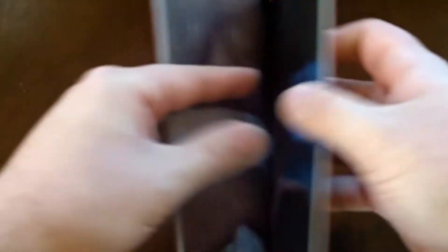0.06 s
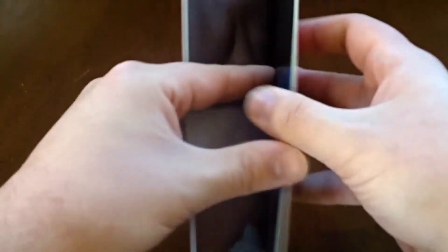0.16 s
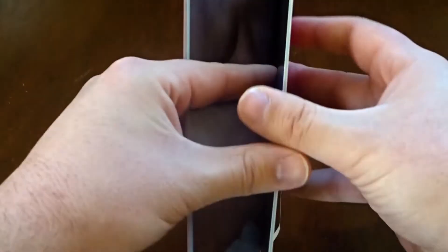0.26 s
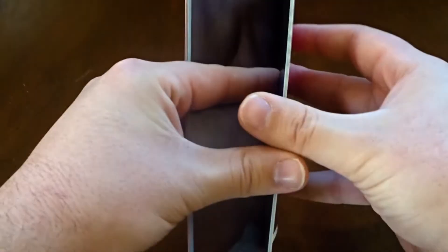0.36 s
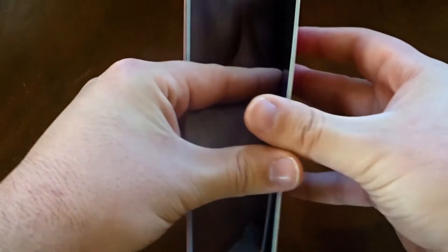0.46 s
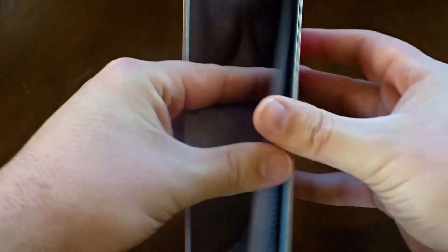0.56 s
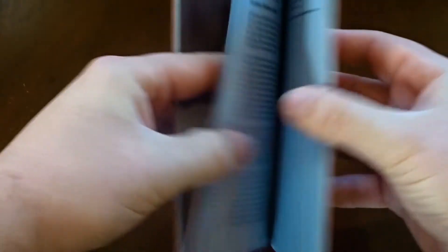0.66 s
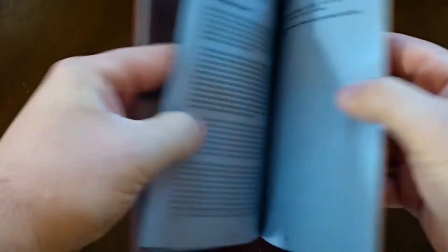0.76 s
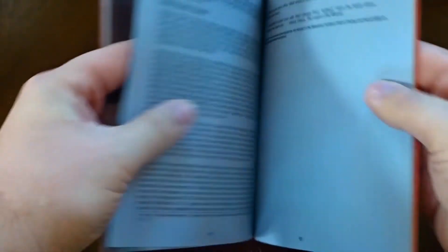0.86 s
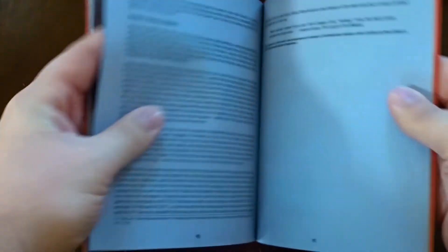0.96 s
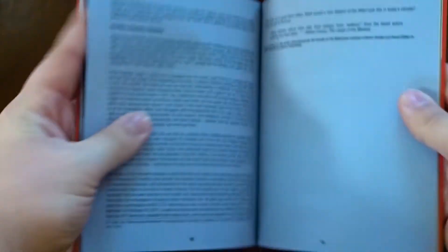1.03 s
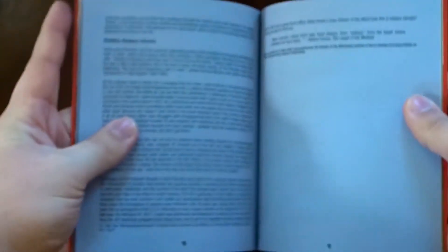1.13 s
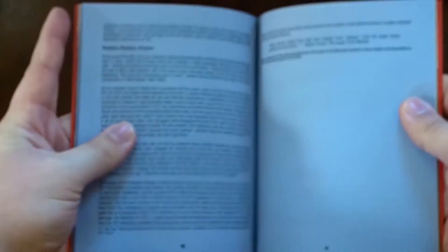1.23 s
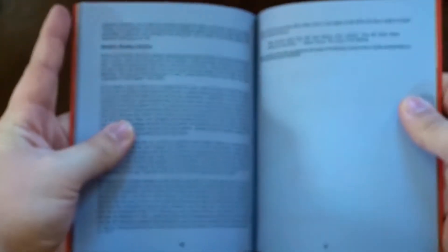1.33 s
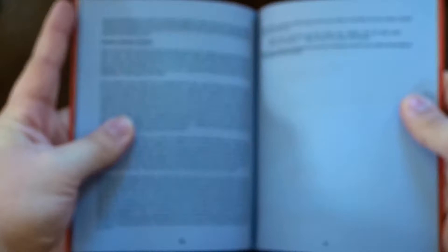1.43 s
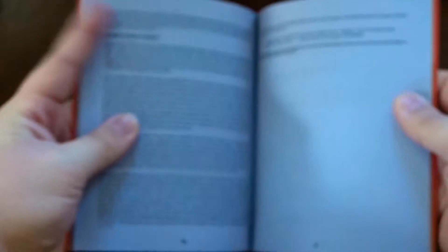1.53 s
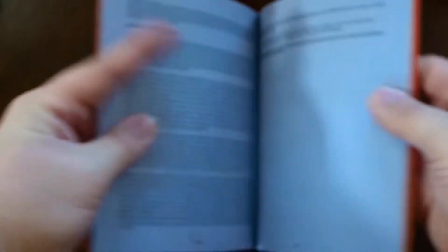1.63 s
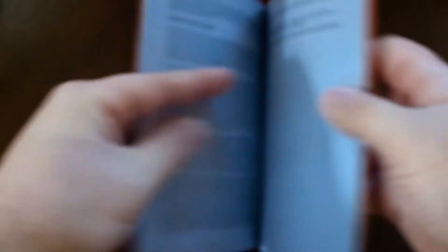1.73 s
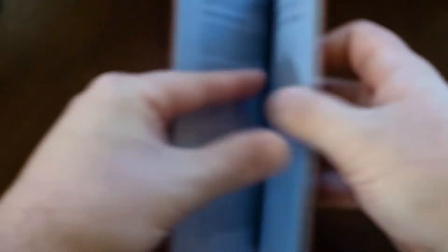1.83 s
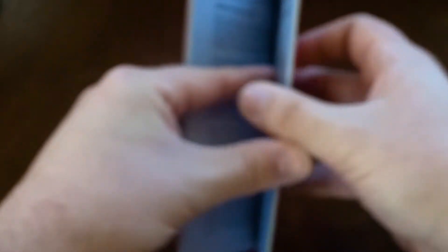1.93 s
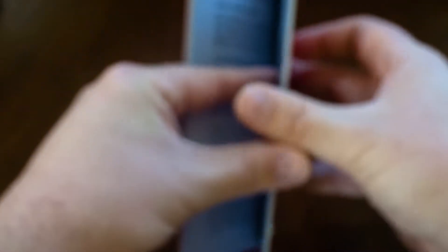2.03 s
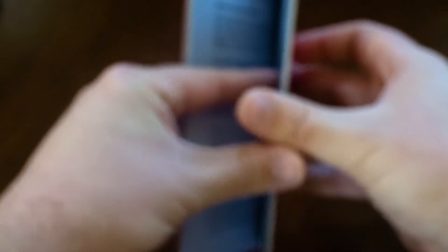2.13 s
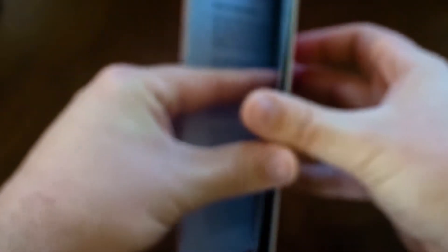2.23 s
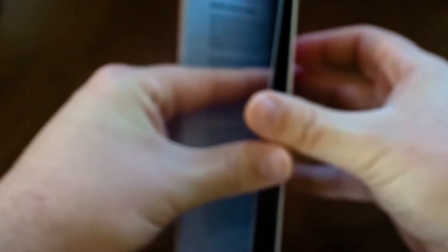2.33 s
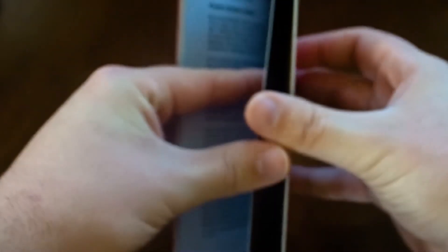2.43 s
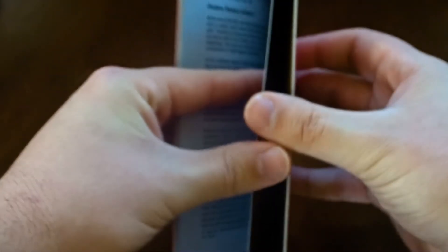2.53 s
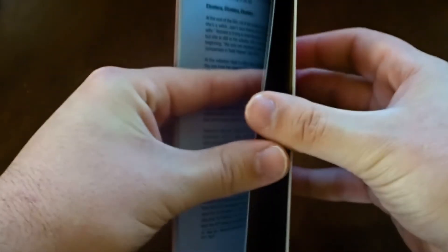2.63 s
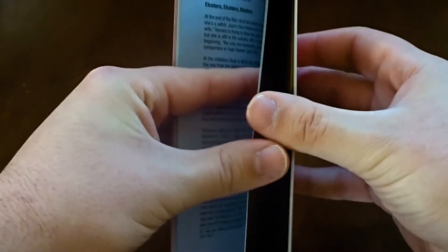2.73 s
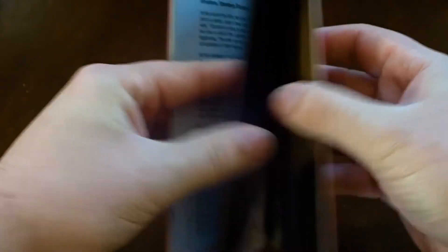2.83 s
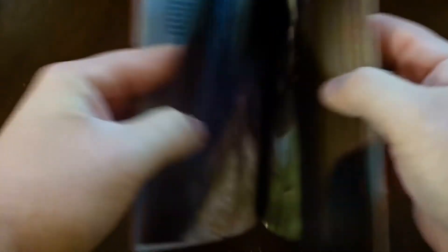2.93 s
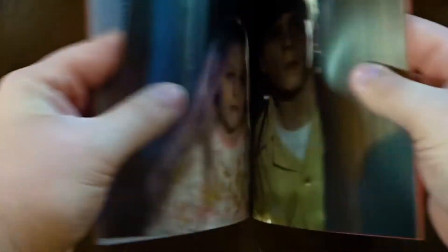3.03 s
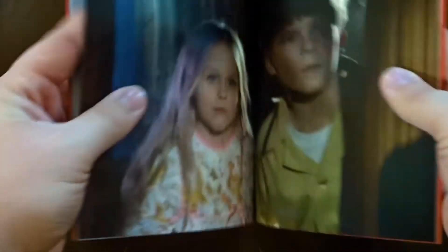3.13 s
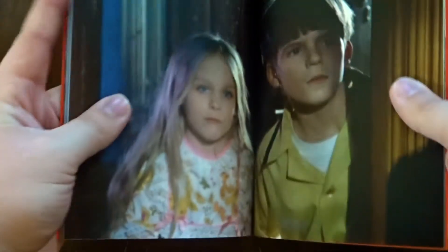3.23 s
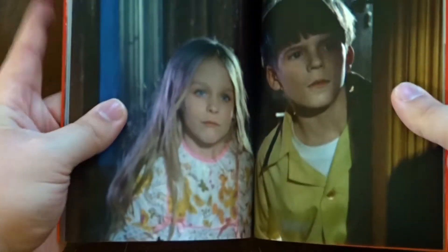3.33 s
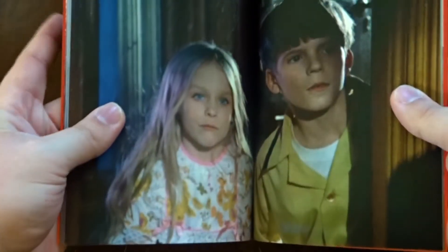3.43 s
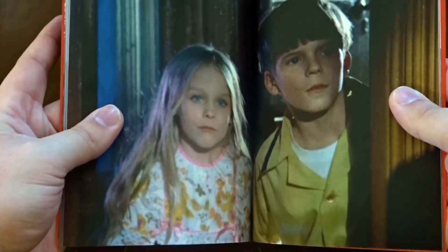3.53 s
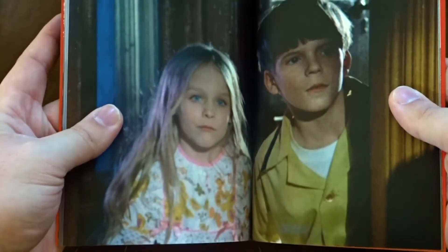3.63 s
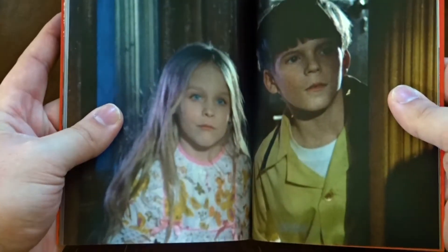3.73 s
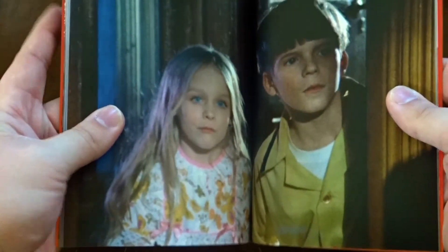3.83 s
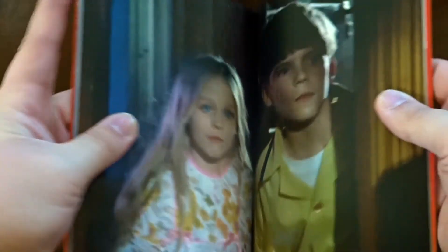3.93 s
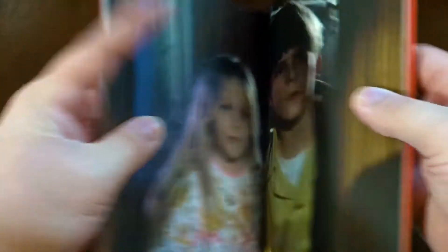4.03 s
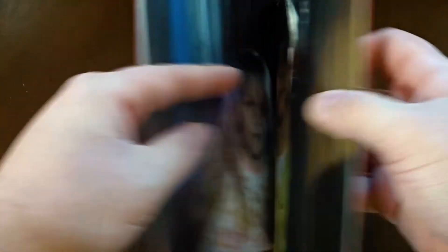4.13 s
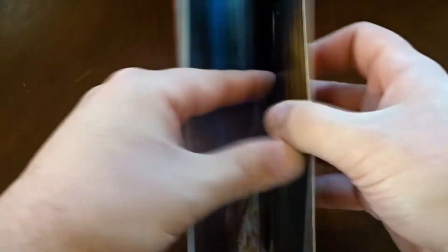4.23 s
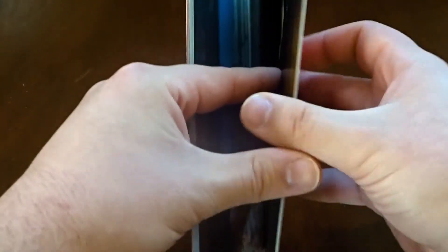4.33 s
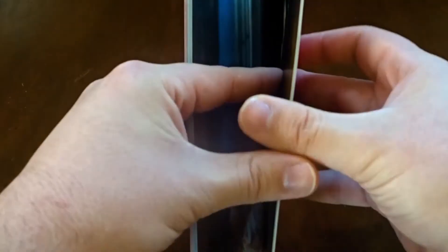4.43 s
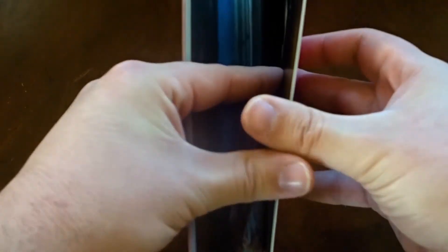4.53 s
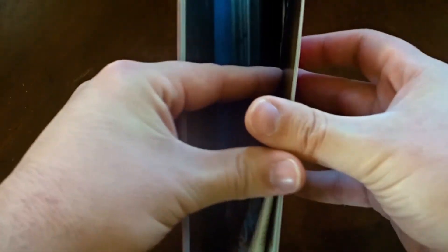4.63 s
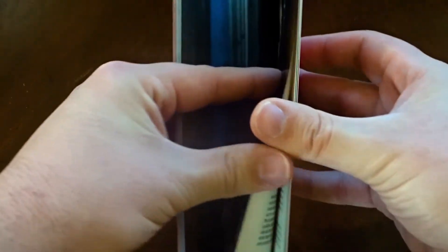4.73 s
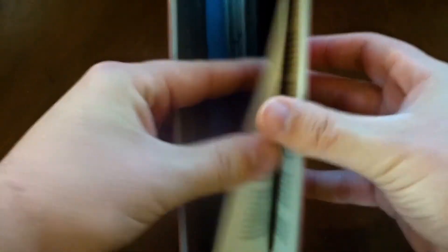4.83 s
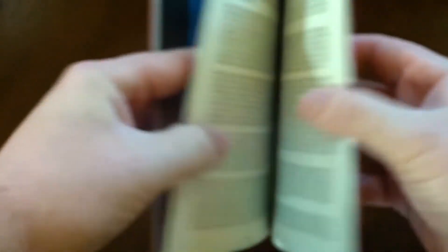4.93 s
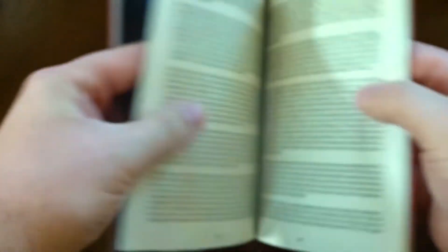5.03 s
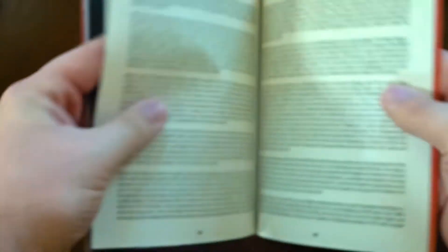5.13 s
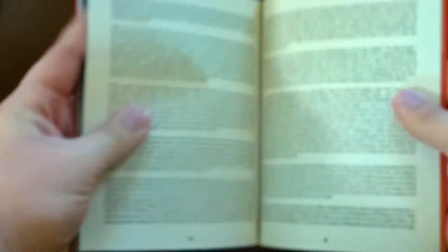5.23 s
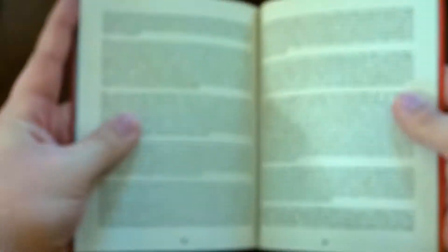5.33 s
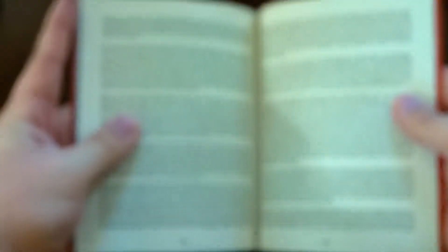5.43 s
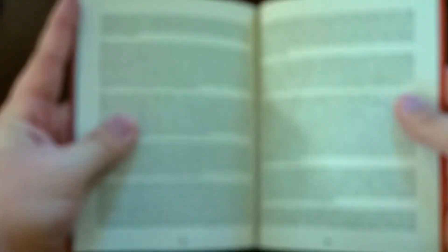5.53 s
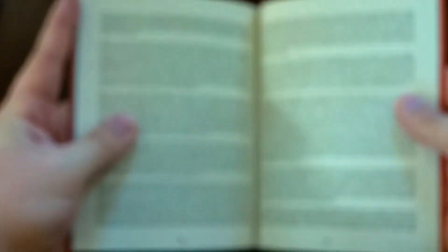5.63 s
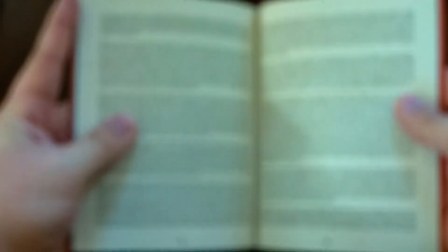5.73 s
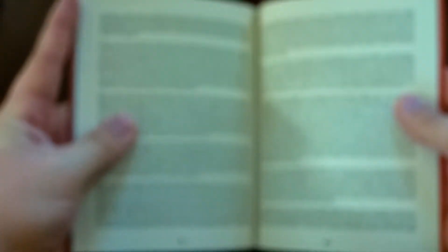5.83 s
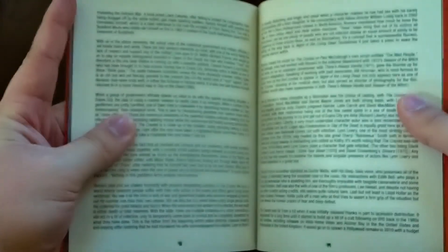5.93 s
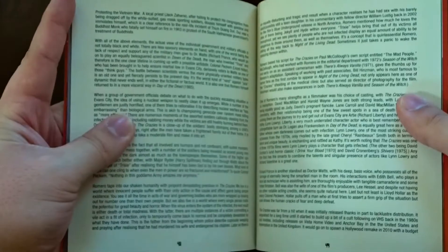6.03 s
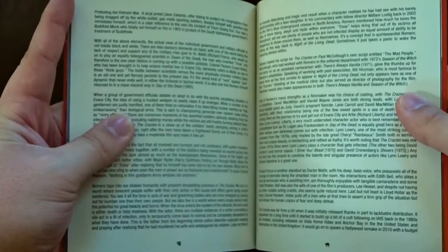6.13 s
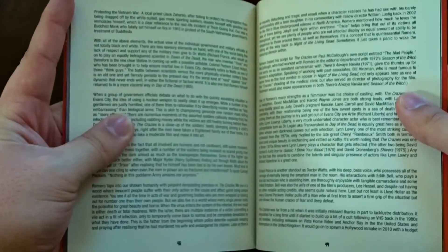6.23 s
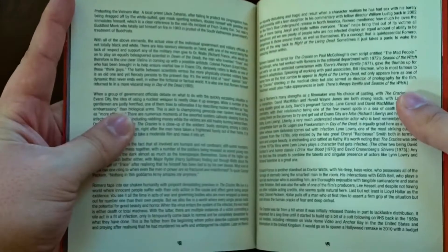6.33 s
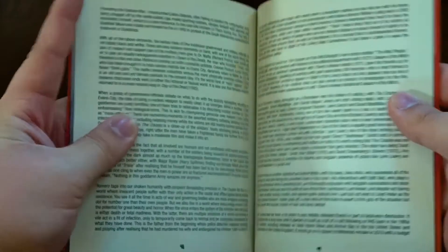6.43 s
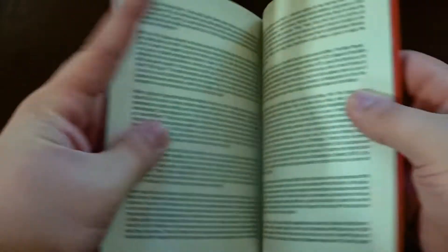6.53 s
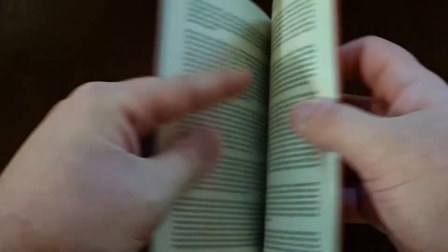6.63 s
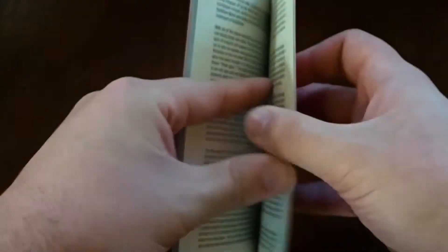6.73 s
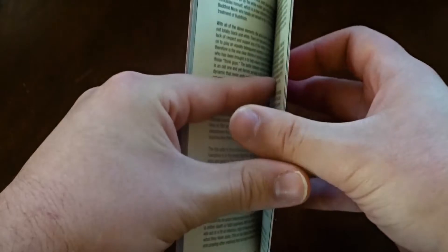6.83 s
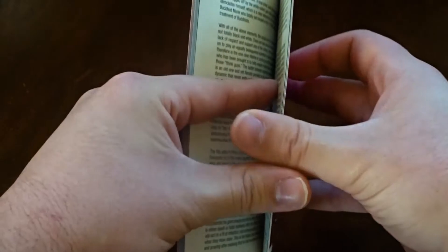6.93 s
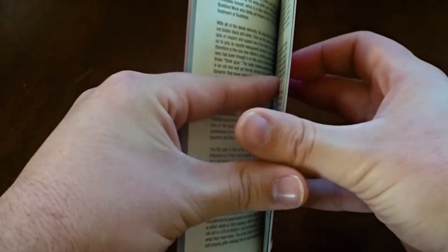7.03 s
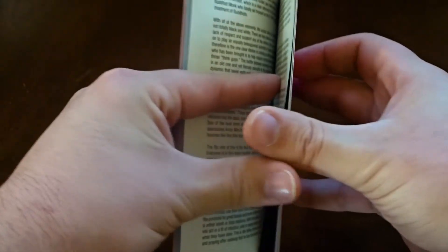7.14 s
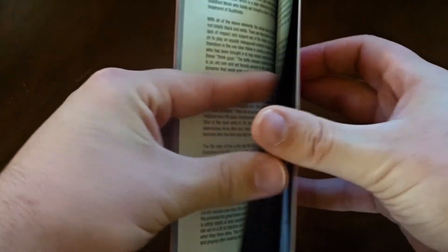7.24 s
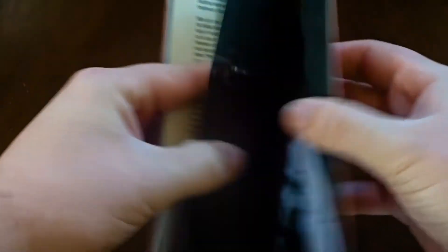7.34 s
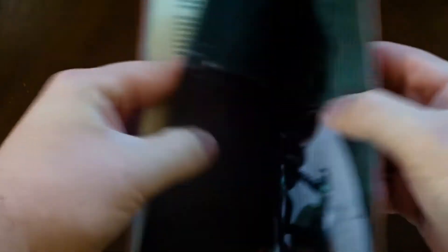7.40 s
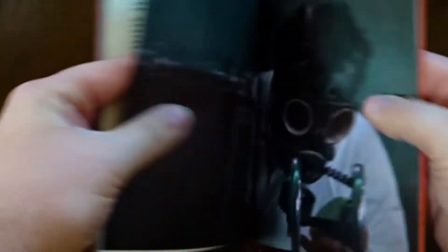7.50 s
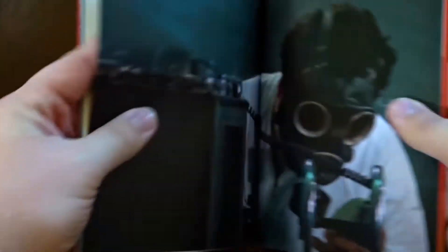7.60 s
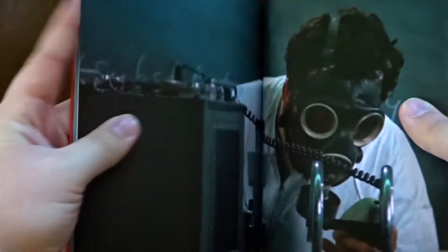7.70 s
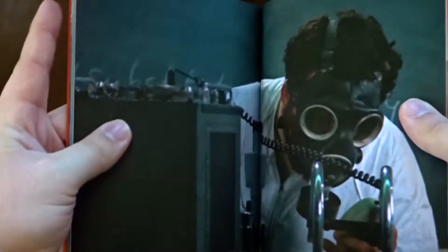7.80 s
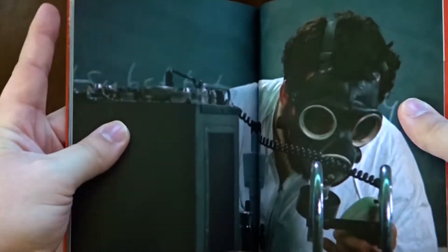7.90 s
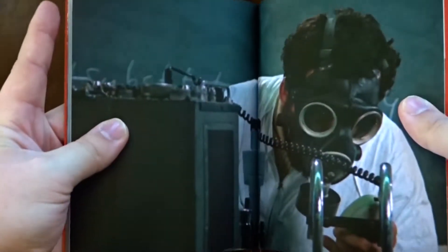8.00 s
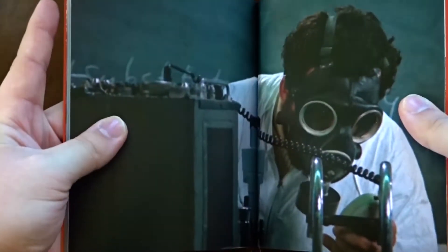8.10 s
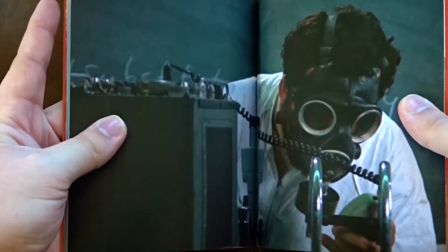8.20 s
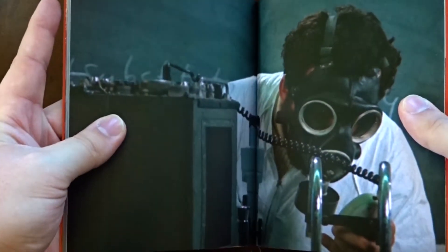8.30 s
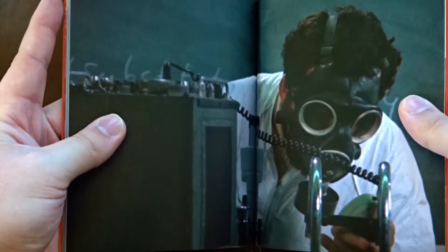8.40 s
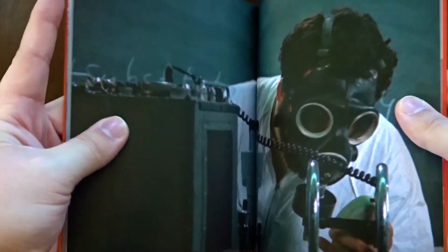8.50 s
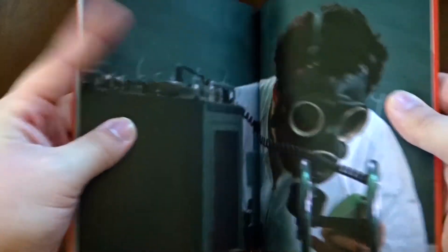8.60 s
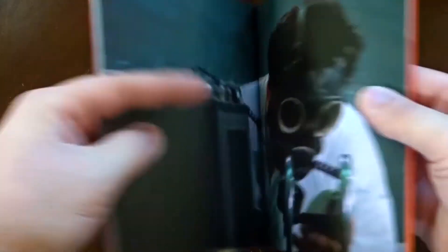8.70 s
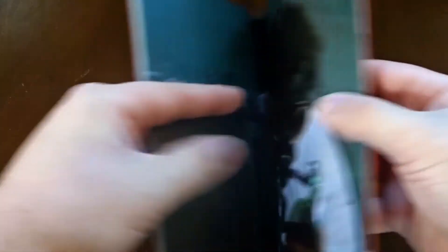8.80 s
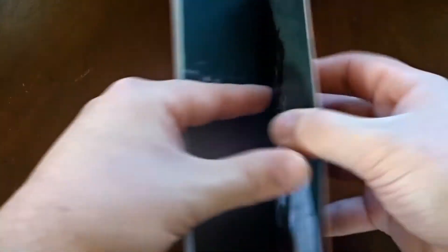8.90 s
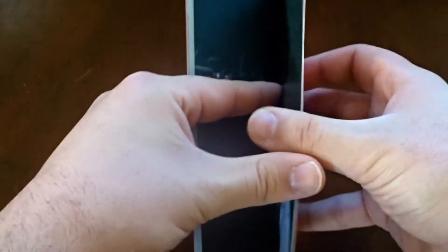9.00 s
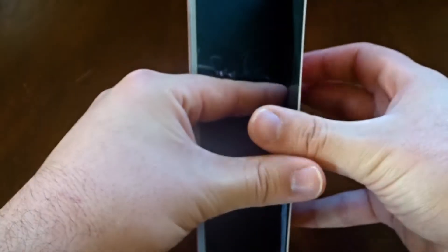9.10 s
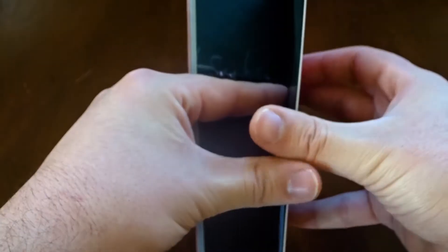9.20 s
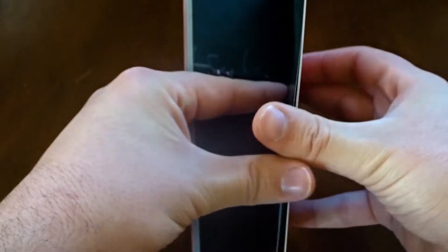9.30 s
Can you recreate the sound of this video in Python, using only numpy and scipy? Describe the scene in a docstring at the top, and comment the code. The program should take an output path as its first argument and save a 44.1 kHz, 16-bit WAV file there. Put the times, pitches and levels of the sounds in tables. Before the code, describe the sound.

Hands open and close a glossy paper booklet again and again, close to the microphone. Each turn brings a few small snaps of page edges, a soft rustle and the bright hiss of thumbs sliding over the paper, sometimes ending in a gentle pat. Short pauses separate the turns, and the crispest come in the middle and later on. A faint low machine hum and thin whir continue behind in the quiet room.

```python
"""A soft rustle and small snaps of paper come first: hands open, smooth and close a glossy booklet.
Thumbs stick and slip on the pages, so the sheets rustle and the skin hisses. Page edges snap free,
the air between pages rings as they open or shut, and pages and fingers land softly on the cover.
Behind this, in a quiet room, a slow machine hums with its turning shaft and whirs in its housing."""
import sys
import numpy as np
from scipy import signal
from scipy.io import wavfile
from scipy.ndimage import uniform_filter1d

SR = 44100
rng = np.random.default_rng(int(sys.argv[2]) if len(sys.argv) > 2 else 0)


def to_wav(s):
    """Save 16-bit WAV."""
    ch = np.atleast_2d(s).T  # columns
    pcm = np.round(np.clip(ch, -1, 1) * 32767)  # PCM
    wavfile.write(sys.argv[1], SR, pcm.astype(np.int16))


N = 412776

# Thumbs smoothing the pages, one list of points per stroke: t/s, rustle level/dB, slide level/dB
STROKES = [
    [(0.0, -58, -60), (0.022, -48.5, -57), (0.046, -53.5, -71), (0.072, -59.5, -60.5), (0.232, -63, -55),
     (0.27, -72, -64)],
    [(0.775, -53, -62), (0.795, -46.5, -45.5), (0.88, -54, -44), (0.9, -49, -53), (0.928, -48, -48),
     (0.95, -44, -37), (1.059, -51.5, -38.5), (1.12, -49.5, -37.5), (1.155, -56, -51)],
    [(1.57, -69, -67), (1.648, -58, -53), (1.685, -57, -55), (1.7, -64, -64), (1.752, -54, -62),
     (1.825, -55, -62), (1.835, -64, -72)],
    [(2.918, -58.5, -59), (3.055, -53, -43), (3.085, -49.5, -49.5), (3.19, -53, -46), (3.262, -44, -43.5),
     (3.29, -59, -54), (3.302, -54, -45.5), (3.325, -65, -60)],
    [(3.908, -66.5, -63), (4.088, -56.5, -59.5), (4.136, -55, -63), (4.144, -48.5, -62),
     (4.206, -53, -55.5), (4.245, -60, -72)],
    [(4.98, -48.5, -59), (5.056, -49, -45.5), (5.104, -49, -48.5), (5.232, -43.5, -40),
     (5.298, -51.5, -42.5), (5.32, -44.5, -39.5), (5.385, -57.5, -48)],
    [(6.5, -62.5, -60), (6.635, -55.5, -59), (6.651, -43.5, -50), (6.681, -47, -61), (6.753, -61.5, -59.5),
     (6.86, -61, -60)],
    [(7.437, -51, -59), (7.485, -50, -42.5), (7.541, -51, -49), (7.623, -46, -41), (7.683, -49.5, -44),
     (7.72, -46.5, -42.5), (7.763, -40, -36.5), (7.785, -57, -54)],
    [(8.63, -57, -54), (8.795, -56, -55), (8.833, -51.5, -53.5), (8.875, -54, -61), (8.959, -60, -61)],
]
# Quick brushes of a finger: loudest t/s, length/s, rustle level/dB, slide level/dB
BRUSHES = [(0.541, 0.039, -49, -47), (0.621, 0.042, -45.5, -48.5), (0.705, 0.078, -54, -49),
           (.733, 0.11, -45, -45), (1.543, 0.027, -54, -42), (2.288, 0.067, -57, -57),
           (2.812, 0.087, -56, -72), (4.294, 0.15, -55, -57), (4.395, 0.13, -58, -55),
           (4.752, 0.092, -39, -42), (4.763, 0.03, -44, -33), (4.935, 0.074, -37, -50),
           (7.18, 0.048, -57, -48), (7.348, 0.026, -48, -66), (7.368, 0.039, -34, -44),
           (8.487, 0.054, -57, -53), (9.13, 0.06, -58, -51), (9.235, 0.092, -56.5, -65)]
def hand_pressure(rise_s=0.02, fade_s=0.031, brush_rise_share=0.37, brush_ends_db=-16.5):
    """How strong rustle and slide are over time: resting fingers, strokes and brushes add up."""
    t = np.arange(0, N / SR, .001)
    power = gain_of([-68.5, -69.5])[:, None] ** 2 * np.ones(len(t))  # resting fingers: rustle, slide
    for stroke in STROKES:
        s, *levels_db = np.transpose(stroke)
        touch = np.interp(t, [s[0] - rise_s, s[0], s[-1], s[-1] + fade_s], [0, 1, 1, 0])
        power += (touch * gain_of([np.interp(t, s, db) for db in levels_db])) ** 2
    for s, length, *levels_db in BRUSHES:
        from_peak = np.maximum((s - t) / brush_rise_share, (t - s) / (1 - brush_rise_share)) / length
        power += (gain_of(levels_db)[:, None] * gain_of(brush_ends_db * from_peak ** 0.65)) ** 2
    return [follow(np.c_[t, gain]) for gain in np.sqrt(power)]


# The tone of the thin sheets and of the duller cover: f/Hz, relative level/dB
PAPER_TONE = [(900, -56), (1500, -4.5), (2200, 1), (4500, -1), (6000, -7), (8000, -16), (16000, -32)]
COVER_TONE = [(150, -2), (400, -7), (800, -1.5), (1200, -3.5), (2000, -12), (16000, -52)]
def rustle():
    """Tiny slips of the thumb shake the sheets and, more faintly, the cover."""
    clicks = slips(per_s=18000, spread_db=0.35, clump_db=1.4)
    sheets = flicker(coloured(clicks, PAPER_TONE), depth_db=2.0)
    return sheets + gain_of(-13) * evened(coloured(clicks, COVER_TONE))


# The tone of skin rubbing on paper: f/Hz, relative level/dB
SKIN_TONE = [(3000, -20), (6000, -5), (8000, -4), (10500, -5.5), (13500, -3), (16000, -6)]
# The hiss brightens and dulls with thumb speed: t/s, added level/dB of the highest treble
SHEEN = [(.85, 0.5), (1.08, 1), (1.13, -1.5), (2.93, 0.5), (3.06, 5), (3.2, 7), (3.25, -2.5), (4.4, 4.5),
         (4.72, -2), (5.06, 4), (5.13, 1), (5.2, 4), (5.38, -7.5), (7.48, 4.5), (7.55, -2), (7.6, 1),
         (7.67, -1.5)]
def slide():
    """Skin on glossy paper slips in very fine steps, which makes a bright hiss."""
    clicks = slips(per_s=16000, spread_db=0, clump_db=0.4)
    return flicker(coloured(clicks, SKIN_TONE), depth_db=2.3, treble_db=follow(SHEEN))


# Pitches at which the booklet's edge rings: f/Hz, width/Hz, relative level/dB
EDGE_RINGS = [(1904, 600, -3), (2340, 1100, -1.5), (3120, 560, -5), (4000, 1800, -16.5)]
# Page snaps: t/s, edge peak level/dB, ring f/Hz, then tick and knock level/dB relative to the edge
SNAPS = [(0.062, -38, 3830, -17, -7), (0.1038, -38.5, 4700, -19, -5), (0.6, -36, 2040, -11, -2),
         (0.6913, -33.5, 2060, -6, -12), (0.7285, -28.5, 2030, 1, -1), (0.7834, -37, 1910, -13, -25),
         (1.5645, -41, 2000, 0, 0), (1.6453, -36, 5400, -14, -6), (1.747, -40, 2600, -8, -15),
         (2.1173, -42, 3530, -32, -4), (2.2307, -40.5, 1860, -27, -4.5), (2.682, -24.5, 2870, -9, -38),
         (2.6892, -37, 3100, -16, -30), (2.9073, -38.5, 3380, -15, -14), (2.9304, -35, 1910, 3.5, -7),
         (2.973, -34, 1930, -3, -4.5), (2.991, -35, 2200, -10, -5), (3.3031, -32.5, 1800, 5, -34),
         (4.145, -37, 2480, -21, -27), (4.278, -39.5, 1940, 3.5, -7.5), (4.331, -38.5, 3370, -14, -25),
         (4.471, -33.5, 2700, -15, -23), (4.562, -32.5, 2130, -18, -6.5), (4.603, -41.5, 3000, -20, -20),
         (4.652, -27, 2180, -12, -7.5), (4.731, -28, 6850, -8, -25), (4.7372, -31, 3900, -3, -25),
         (4.742, -31, 3700, 1, -21), (4.747, -27, 4600, -8, -20), (4.7515, -30, 4300, -15, -18),
         (4.904, -31, 3220, -25, -19), (4.9184, -27, 2520, -20, -31), (4.9368, -25, 1940, -3, -12),
         (4.9696, -31, 5060, 2, -4), (6.445, -37.5, 1830, 2, 0.5), (6.488, -45.5, 5000, 4, 2),
         (6.5328, -41.5, 1910, 6, 2.5), (7.056, -45, 3500, -20, -25), (7.209, -41, 2990, -22, -27),
         (7.3424, -33, 2620, -12, -8), (7.36, -26.5, 2400, -14, -14), (7.3695, -21.5, 2020, -8, -13),
         (7.4033, -29.5, 4470, 1, 0), (8.5568, -42, 1880, -18, 1), (8.6262, -36, 7300, 5, 0),
         (8.673, -36.5, 2190, -3, -2), (8.954, -41, 3200, -23, -23), (9.001, -42, 4760, -21, -21)]
def page_snaps():
    """Each page snapping free rings the booklet's edge, with a bright tick and a knock in the cover."""
    t = np.arange(2500) / SR
    for s, edge_db, ring_hz, tick_db, knock_db in SNAPS:
        noise = rng.standard_normal(len(t))
        crack = noise * (1 - np.exp(-t / 0.00036)) * np.exp(-t / 0.00084)
        shiver = crack + 0.12 * noise * np.exp(-t / 0.015)  # the freed page trembles on
        edge = sum(gain_of(db) * evened(resonate(shiver, hz, width)) for hz, width, db in EDGE_RINGS)
        edge += 0.94 * evened(coloured(shiver, PAPER_TONE))
        edge += 0.83 * evened(resonate(shiver, ring_hz, width_hz=910))
        tick = coloured(crack + 0.21 * shiver, SKIN_TONE)
        knock = coloured(shiver, COVER_TONE)
        parts = [(edge, 0), (tick, tick_db), (knock, knock_db)]
        yield s, gain_of(edge_db) * sum(gain_of(db) * part / abs(part).max() for part, db in parts)


# Air gaps between pages: t/s, length/s, starting f/Hz, ending f/Hz, level/dB before shaping
GAPS = [(0.775, 0.18, 5100, 5500, -47), (0.776, 0.073, 1640, 2500, -47), (0.923, 0.14, 2020, 2580, -49),
        (1.087, 0.05, 2730, 7500, -40), (2.942, 0.083, 1870, 1940, -48), (2.976, 0.13, 4700, 5200, -51.5),
        (3.203, 0.055, 1940, 3160, -45), (4.759, 0.016, 4570, 4500, -28), (4.762, 0.015, 5470, 6000, -32.5),
        (4.753, 0.028, 3380, 3440, -35), (4.165, 0.072, 3560, 4200, -48), (4.759, 0.021, 2320, 2400, -35),
        (4.91, 0.049, 2220, 2450, -39.5), (5.013, 0.19, 5000, 5800, -49), (5.188, 0.06, 2200, 2950, -50),
        (5.305, .04, 2680, 3000, -43), (7.434, 0.2, 5000, 5300, -48.5), (7.555, 0.059, 1950, 1890, -46.5),
        (7.635, 0.026, 2870, 3120, -43), (7.689, 0.11, 2310, 3550, -40), (7.731, 0.053, 5450, 6050, -41.5)]
def air_gaps():
    """The air between two pages rings with a gliding pitch while the gap opens or shuts."""
    for s, length, from_hz, to_hz, db in GAPS:
        width_hz = 390 + 0.52 * length * from_hz + 0.11 * abs(to_hz - from_hz)
        yield s, gain_of(db) * puff(length, from_hz, to_hz, width_hz, crackle_db=1.5, peak_share=0.36)


# Soft landings: t/s, length/s, level/dB before shaping, f/Hz
LANDINGS = [(0.594, 0.038, -51.5, 684), (0.727, 0.02, -42, 354), (1.081, 0.074, -50, 880),
            (1.552, 0.074, -51.5, 775), (2.923, 0.041, -52, 850), (3.21, 0.098, -49.5, 830),
            (5.292, 0.088, -48, 660), (6.439, 0.036, -53, 584), (7.722, 0.081, -48.5, 1080),
            (7.815, 0.092, -55.5, 890), (8.546, 0.027, -55, 800)]
def landings():
    """Pages and fingers land on the cover with a low, soft pat."""
    for s, length, db, hz in LANDINGS:
        yield s, gain_of(db) * puff(length, hz, hz, width_hz=0.64 * hz, crackle_db=2.5, peak_share=0.12)


# The shaft's notes: vibrations per turn, relative level/dB
SHAFT_NOTES = [(7, -8), (8, -0.5), (9, -6.5)]
# How loud the shaft hums: t/s, level/dB
HUM_LEVEL = [(0, -50.5), (3.2, -49), (3.6, -52.5), (4.2, -51), (5.2, -53.5), (8.5, -51.5), (9.36, -56.5)]
# Other steady tones: f/Hz, level/dB
STEADY_TONES = [(75.2, -69.5), (108.6, -64), (120, -58), (15734, -75)]
def machine_hum(shaft_hz=11.0):
    """The notes of a slow shaft throb together once a turn; a few unrelated tones sound beside them."""
    t = np.arange(N) / SR
    turns = shaft_hz * t + rng.random()
    shaft = sum(gain_of(db) * np.cos(2 * np.pi * per_turn * turns) for per_turn, db in SHAFT_NOTES)
    tones = sum(gain_of(db) * np.sin(2 * np.pi * (hz * t + rng.random())) for hz, db in STEADY_TONES)
    return np.sqrt(2) * (gain_of(follow(HUM_LEVEL)) * shaft + tones)


# The lower and upper ring of the machine's housing: f/Hz, width/Hz, relative level/dB
HOUSING_RINGS = [(1553, 143, 2), (1785, 306, 3.5)]
# How loud the whir is: t/s, level/dB, added level/dB of the upper ring
WHIR_LEVEL = [(0, -60.5, 0), (.35, -66, -5), (.7, -56, 3), (1.15, -64, -5), (1.45, -54, -2),
              (1.95, -60.5, -1), (2.5, -54.5, -5.5), (3.0, -58, -2.5), (4.3, -60.5, 2.5), (5.3, -60, -3),
              (5.75, -53, -3), (6.0, -57.5, -4), (6.7, -59.5, 5), (8.6, -59.5, 0), (9.1, -66, 0),
              (9.36, -56.5, -1)]
def machine_whir(lowest_hz=1445):
    """Fluttering noise rings at two pitches in the housing, which lets little low sound through."""
    noise = 0.99 * rng.standard_normal(N) + rng.standard_normal((2, N))  # shared + each side's own
    noise = signal.sosfilt(signal.butter(8, lowest_hz, "high", fs=SR, output="sos"), noise)
    s, level_db, upper_db = np.transpose(WHIR_LEVEL)
    upper_lean_db = follow(np.c_[s, upper_db]) - np.array([[0], [15]])  # the upper ring leans left
    whir = np.zeros((2, N))
    for (hz, width, db), lean_db in zip(HOUSING_RINGS, [0, upper_lean_db]):
        peak = signal.iirpeak(hz, hz / width, SR)
        ring = evened(signal.lfilter(*peak, signal.lfilter(*peak, noise)))
        whir += gain_of(db + lean_db + 3 * drift(samples=350)) * ring
    return gain_of(follow(np.c_[s, level_db])) * evened(whir)


# How long the echo lasts: f/Hz, time/s to fade by 60 dB
ECHO_FADE = [(300, 1), (2000, 0.52), (6000, 0.082), (15000, 0.018)]
def room_echo(x):
    """Many small reflections, different in each ear; high pitches start weaker and die sooner."""
    bounces = np.zeros((2, SR // 2))
    slots = np.arange(100, SR // 2 - 20, 20)
    arrivals = slots + rng.integers(0, 20, (2, len(slots)))
    np.put_along_axis(bounces, arrivals, rng.choice([-1., 1.], arrivals.shape), 1)
    hz, t, spectra = signal.stft(bounces, SR, nperseg=128)
    fade_db = -60 * t / at_pitch(ECHO_FADE, hz)[:, None] - 0.97 * hz[:, None] / 1000
    tail = signal.istft(spectra * gain_of(fade_db), SR, nperseg=128)[1]
    return signal.oaconvolve(x[None], tail / np.linalg.norm(tail[0]), axes=1)[:, :N]


# The tone of the quiet room: f/Hz, relative level/dB
AIR_TONE = [(15, -8), (55, -1), (140, -4), (228, 0.5), (250, -6.5), (270, -6.5), (400, -9.5), (700, -12),
            (1200, -16.5), (2300, -20.5), (4500, -27), (7000, -30), (16000, -34.5)]
# How alike left and right are: f/Hz, likeness (1 the same, 0 unrelated, -1 opposite)
AIR_LIKENESS = [(45, 1), (90, 0.85), (170, 0.9), (340, 0.2), (520, -0.53), (1250, -0.42), (1550, 0.18),
                (2300, -0.99), (4200, -0.09), (6900, 0.55), (10300, 1), (14000, 1)]
def room_air(level_db=-53):
    """Room air and microphone hiss: steady noise, partly alike in the two ears."""
    hz = np.fft.rfftfreq(2048, 1 / SR)
    a, b, c, d = rng.standard_normal((N // 1024 + 3, len(hz), 4)).T
    left, unrelated = a + 1j * b, c + 1j * d
    likeness = at_pitch(AIR_LIKENESS, hz)[:, None]
    right = likeness * left + np.sqrt(1 - likeness ** 2) * unrelated
    spectra = np.array([left, right]) * gain_of(at_pitch(AIR_TONE, hz))[:, None]
    noise = signal.istft(spectra, window="cosine", nperseg=2048)[1]
    return gain_of(level_db) * evened(noise[:, :N])


def slips(per_s, spread_db, clump_db):
    """Sticking and slipping makes tiny clicks of uneven size that come in clumps."""
    happens = rng.random(N) < per_s / SR
    size_db = spread_db * np.minimum(rng.exponential(1, N), 5)
    clicks = happens * rng.standard_normal(N)
    return evened(clicks * gain_of(size_db + clump_db * drift(samples=130)))


def puff(length_s, from_hz, to_hz, width_hz, crackle_db, peak_share):
    """A crackly puff of ringing noise that swells until peak_share of its length, then fades."""
    count = round(length_s * SR)
    noise, crackle = rng.standard_normal((2, SR // 4))[:, :count]
    noise = noise * gain_of(crackle_db * evened(uniform_filter1d(crackle, size=60)))
    progress = np.linspace(0, 1, count)
    hz = from_hz * (to_hz / from_hz) ** progress ** 1.4  # a glide starts slowly and ends fast
    shape = np.interp(progress, [0, peak_share, .75, 1], [0.47, 0.76, 0.45, 0.07])
    return evened(resonate(noise, hz, width_hz)) * shape


def flicker(x, depth_db, treble_db=0):
    """Turns random patches (about 800 Hz by 30 ms) up or down; treble_db lifts the highest treble."""
    hz, t, spectra = signal.stft(x, SR, nperseg=256)
    patches = rng.standard_normal(spectra.shape[::-1]).T
    patches = evened(uniform_filter1d(uniform_filter1d(patches, size=5, axis=0), size=10, axis=1))
    treble_share = np.interp(hz, [8500, 11900], [0, 1])[:, None]
    lift_db = treble_share * np.interp(t, np.arange(N) / SR, treble_db * np.ones(N))
    return evened(signal.istft(spectra * gain_of(depth_db * patches + lift_db), nperseg=256)[1][:len(x)])


def coloured(x, tone):
    """Filters a sound so that it takes on the tone in a table."""
    log_gain = at_pitch(tone, abs(np.fft.fftfreq(512, 1 / SR))) * np.log(10) / 20
    taps = np.fft.ifft(np.exp(log_gain - 1j * signal.hilbert(log_gain).imag)).real
    return signal.oaconvolve(x, taps / np.linalg.norm(taps))[:len(x)]


def resonate(x, hz, width_hz):
    """Makes a sound ring near hz: shifts that pitch down to zero, smooths twice, and shifts back."""
    turn = np.exp(2j * np.pi * np.cumsum(hz * np.ones(len(x))) / SR)
    decay = np.exp(-np.pi * width_hz / SR)
    return 2 * (turn * signal.lfilter([(1 - decay) ** 2], [1, -2 * decay, decay ** 2], x / turn)).real


def drift(samples):
    """A random wobble, smoothed over this many samples."""
    return evened(uniform_filter1d(uniform_filter1d(rng.standard_normal(N), samples), samples))


def at_pitch(table, hz):
    """Looks up a table by frequency, on a scale of octaves."""
    f, value = np.transpose(table)
    return np.interp(np.log(hz + 1), np.log(f + 1), value)


def follow(table):
    """Joins points in time with straight lines, giving a value for every sample."""
    s, value = np.transpose(table)
    return np.interp(np.arange(N) / SR, s, value)


def gain_of(db):
    """Turns decibels into a number to multiply by."""
    return 10 ** (np.asarray(db) / 20)


def evened(x):
    """Scales a signal to an average strength (rms) of 1."""
    return x / np.sqrt(np.mean(x ** 2) + 1e-20)


def scene():
    """The booklet in front, then its echo, the machine and the room air."""
    short_sounds = [*page_snaps(), *air_gaps(), *landings()]
    rustle_gain, slide_gain = hand_pressure()
    booklet = rustle_gain * rustle() + slide_gain * slide()
    for s, sound in short_sounds:
        start = round(s * SR)
        booklet[start:start + len(sound)] += sound[:N - start]
    return booklet + gain_of(-16) * room_echo(booklet) + machine_hum() + machine_whir() + room_air()


def record(dry):
    """The recorder cuts off the very highest treble."""
    top_hz = 15880
    return signal.oaconvolve(dry, signal.firwin(1023, top_hz, window=("kaiser", 9), fs=SR)[None], "same")


dry = scene()
out = record(dry)
to_wav(out)
```